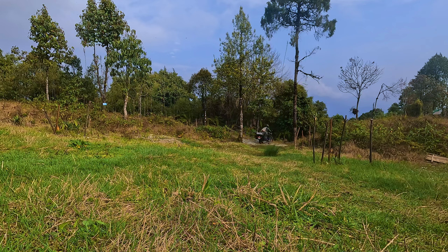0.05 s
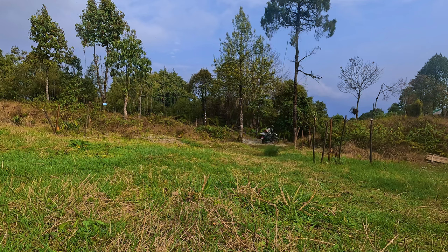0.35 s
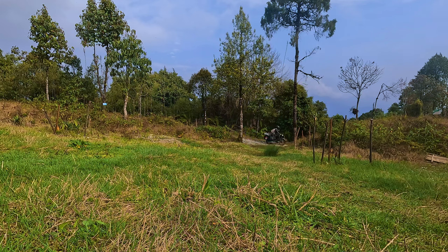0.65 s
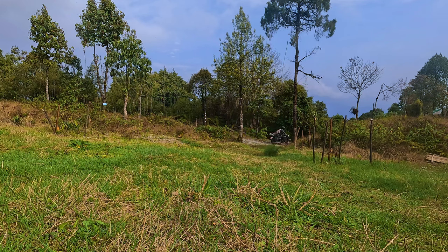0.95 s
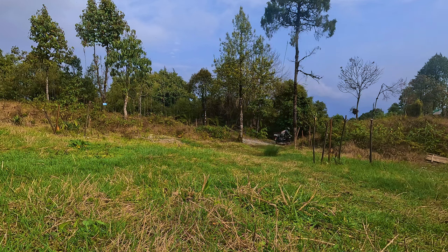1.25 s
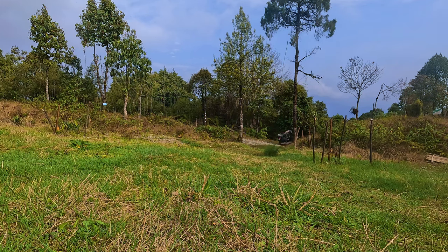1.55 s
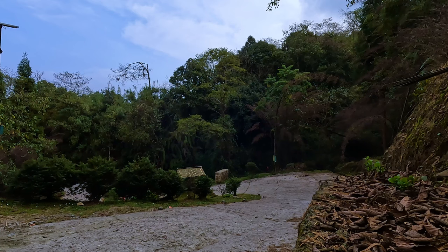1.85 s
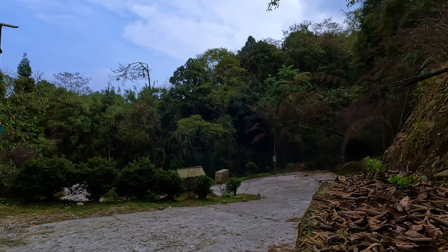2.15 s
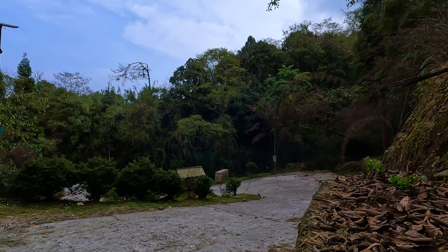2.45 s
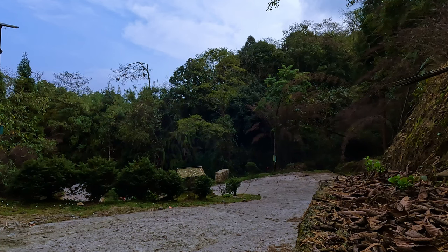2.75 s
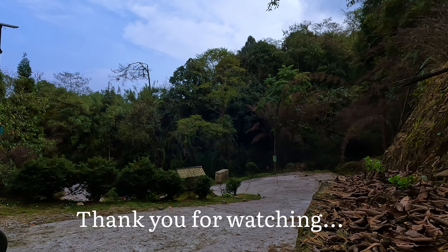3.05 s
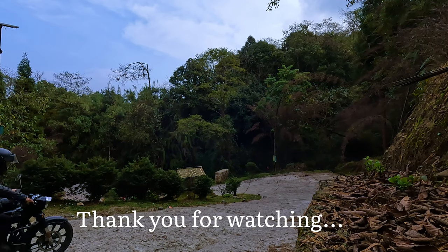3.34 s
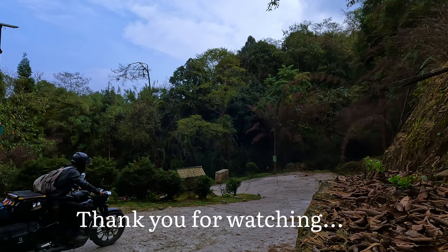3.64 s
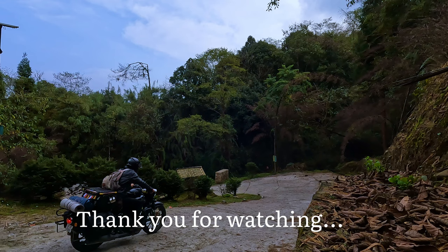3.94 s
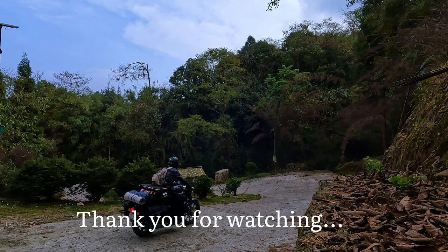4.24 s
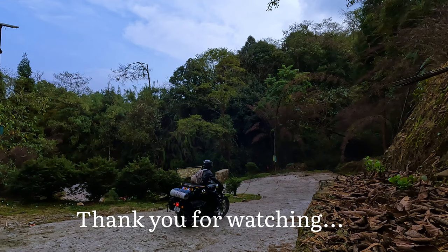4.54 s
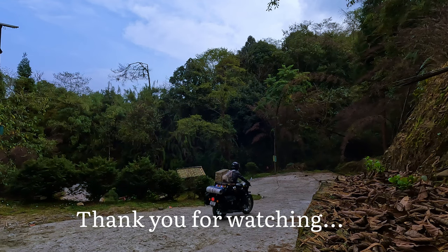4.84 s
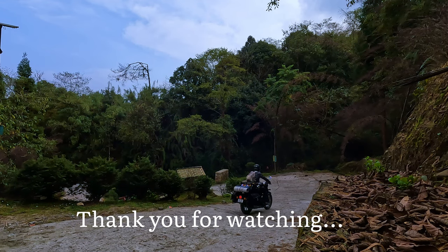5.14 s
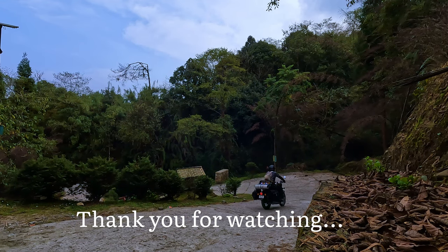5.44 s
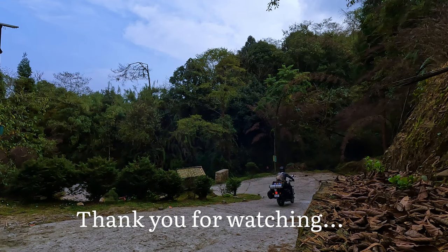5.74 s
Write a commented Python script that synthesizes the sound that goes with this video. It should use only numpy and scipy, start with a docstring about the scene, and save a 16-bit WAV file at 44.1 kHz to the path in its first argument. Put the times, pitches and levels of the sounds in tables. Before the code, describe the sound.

In quiet woodland, thin bird calls sound over the low, steady beat of a faraway motorcycle. The sound suddenly switches to the same bike near the microphone, coming from the left with a short, cracking rev. The single-cylinder engine eases to a slower thump as it goes by, small stones snapping under the tyres while a bird whistles a clear phrase. It recedes with a few clanks and a high trill.

```python
"""A motorcycle on a wooded road

A single-cylinder bike thumps far off across a meadow. Then the scene jumps close: it comes from the
left, barks at a blip of the throttle, passes over gravel and rides away. Each firing of the engine
pushes a puff of gas through the silencer, while the casing rattles and the tyres and chain hiss.
Birds twitter, call, trill and whistle, and the trees echo them."""
import sys
import numpy as np
from scipy import signal
from scipy.fft import rfft, irfft
from scipy.io import wavfile

SR = 44100
rng = np.random.default_rng(int(sys.argv[2]) if len(sys.argv) > 2 else 0)


def put_to_file(sound):
    """Save the sound as 16-bit audio at rate SR, in the file named by the first command-line argument."""
    columns = np.atleast_2d(sound).T  # one column per channel
    safe = np.clip(columns, -1, 1)
    whole_steps = np.round(safe * 32767)
    wavfile.write(sys.argv[1], SR, whole_steps.astype(np.int16))


N = 259749
TIME = np.arange(N) / SR
HZ = np.fft.rfftfreq(N, 1 / SR) + 1e-3


def gain_of(db):
    """Turns decibels into a number to multiply by."""
    return 10 ** (np.asarray(db) / 20)


def evened(x):
    """Scales a signal to an average (rms) level of 1."""
    return x / np.sqrt(np.mean(x ** 2) + 1e-20)


def curve(rows, column=1):
    """Joins a table's points in time with straight lines."""
    rows = np.array(rows)
    return np.interp(TIME, rows[:, 0], rows[:, column])


def colour(x, points, peaks=()):
    """Shapes a tone by (Hz, dB) points and ringing peaks, then evens its level."""
    hz, db = np.transpose(points)
    octaves_outside = np.maximum(np.log2(hz[0] / HZ), 0) + np.maximum(np.log2(HZ / hz[-1]), 0)
    db = np.interp(np.log(HZ), np.log(hz), db) - 24 * octaves_outside
    db += sum(lift / (1 + (2 * (HZ - centre) / width) ** 2) for centre, width, lift in peaks)
    return evened(irfft(rfft(x) * gain_of(db), N))


def muffled(x, hz, steepness):
    """Takes away the treble above hz."""
    return irfft(rfft(x) / (1 + (HZ / hz) ** steepness), N)


def noise(spread):
    """White noise shared by both ears, plus some of their own."""
    return evened(rng.standard_normal(N) + spread * rng.standard_normal((2, N)))


def wander(hz):
    """A random wobble, with little motion faster than hz."""
    return evened(irfft(rfft(rng.standard_normal(N)) * np.exp(-(HZ / hz) ** 2), N))


def bursts(rows, rise_s=0.0022):
    """A level that jumps up and dies away at each (start, dB, fade time)."""
    level = np.zeros(N)
    for start, db, fade_s in rows:
        age = np.maximum(TIME - start, 0)
        level += gain_of(db) * (1 - np.exp(-age / rise_s)) * np.exp(-age / fade_s)
    return level


def tails(hits, fade_s):
    """Gives each hit a fading tail."""
    return signal.lfilter([1], [1, -np.exp(-1 / (fade_s * SR))], hits)


def panned(db):
    """Left and right gains; positive dB leans left."""
    left = gain_of(db) * np.ones(N)
    return 2 * np.array([left, np.ones(N)]) / (1 + left)


def treble_panned(x, db):
    """Low notes bend round the listener, so only higher ones lean to one side."""
    low = muffled(x, 560, steepness=4)
    return low + (x - low) * panned(db)


def woods(x, echo_s):
    """Scattered echoes off trunks and leaves, different at each ear."""
    t = TIME[:SR]
    echoes = rng.standard_normal((2, SR)) * (rng.random((2, SR)) < .05)
    echoes *= gain_of(-60 * t / echo_s) * (t > .006)
    return signal.fftconvolve(x[None], echoes / np.linalg.norm(echoes[0]), axes=1)[:, :N]


def resonance(hz, width):
    """A filter that rings at one pitch."""
    return 1 / (1 + 1j * (HZ - hz ** 2 / HZ) / width)


def puff(hz):
    """The spectrum of a rounded puff of gas, with little above hz."""
    return np.exp(-(HZ / hz) ** 2 / 2)


def count_cycles(ride):
    """Counts engine cycles; the engine fires at each whole number."""
    return .5 + np.cumsum(curve(ride) * (TIME >= ride[0][0])) / SR


def strokes(cycles, lag, uneven_db):
    """One hit of uneven size per cycle, lag cycles after the firing."""
    hits = np.diff(np.floor(cycles - lag), prepend=np.floor(cycles[0] - lag))
    return hits * gain_of(uneven_db * rng.standard_normal(N))


def beat(cycles, lag, fade):
    """A level that jumps once a cycle and fades; lag and fade are in cycles."""
    return np.exp(-((cycles - lag) % 1) / fade)


# The silencer's notes. Each row: pitch in Hz, width in Hz, gain (minus flips the wave).
SILENCER_NOTES = [(48.5, 26, -1.4), (110, 48, 3.35), (121.5, 32, -2.4), (195, 42, -1.0)]
# The tail pipe's overtones. Each row: pitch in Hz, width in Hz, relative level in dB.
PIPE_NOTES = [(229, 34, 5.5), (294, 72, -2), (387, 110, -24), (558, 78, -25.5)]


def thump(cycles, strength_db, odd_db, soft_hz, sharpness, suction):
    """Each firing puffs through the silencer; a third of a cycle later the intake booms in the air box."""
    strength = gain_of(strength_db)
    firings = strength * gain_of(odd_db) * strokes(cycles, 0, .4)
    intakes = strength * suction * strokes(cycles, .325, .8)
    silencer = sum(gain * resonance(hz, width) for hz, width, gain in SILENCER_NOTES)
    pipe = sum(gain_of(db) * resonance(hz, width) for hz, width, db in PIPE_NOTES)
    exhaust = rfft(firings) * puff(soft_hz) * silencer
    air_box = rfft(intakes) * puff(118.6) * resonance(55.8, width=40)
    ring = rfft((firings + 0.35 * intakes) * sharpness) * puff(300) * pipe  # sharp puffs ring the pipe
    ring *= np.exp(-2j * np.pi * HZ * .0015)  # 1.5 ms later
    return gain_of(46) * irfft(exhaust + air_box - ring, N)


def valve_ticks(cycles, lag, second_gain, level_db):
    """The valves make two tiny bright ticks a cycle."""
    hits = strokes(cycles, lag, 1.1) + second_gain * strokes(cycles, 0.23, 2.2)
    tone = [(5000, 3.5), (8000, -1.5), (10300, -4.5), (12500, -1), (14000, -22)]
    return gain_of(level_db) * colour(noise(1) * tails(hits, fade_s=0.0068), tone)


# The far engine. Each row: time in seconds, firings per second, relative strength in dB.
FAR_ENGINE = [(0.0, 8.523, -23.7), (0.2, 8.277, -21.4), (0.4, 8.663, -21.9), (0.55, 8.58, -20.7),
              (0.95, 8.629, -22.4), (1.2, 8.207, -22.5), (1.35, 8.347, -24.0), (1.65, 8.599, -22.0)]
# Echoes off the hillside. Each row: delay in seconds, level in dB against the thump.
HILLSIDE = [(0.054, -22), (.071, -24)]


def far_bike():
    """A distant engine thumps, chuffs and ticks; hill and trees send the thump back."""
    cycles = count_cycles(FAR_ENGINE)
    engine = thump(cycles, curve(FAR_ENGINE, column=2), odd_db=0, soft_hz=147, sharpness=0.053, suction=.25)
    hill = sum(gain_of(db) * np.interp(TIME - delay, TIME, engine, left=0) for delay, db in HILLSIDE)
    trees = gain_of(-10) * woods(engine, echo_s=1).mean(0)
    flow = rng.standard_normal(N) * beat(cycles, .04, 0.18)
    chuff = gain_of(-59) * colour(flow, [(150, 7), (300, -7.5), (550, -16.5), (750, -32.5)])
    ticks = valve_ticks(cycles, lag=.27, second_gain=.2, level_db=-77)
    ticks = muffled(ticks, 10500, steepness=12)  # the air swallows the top
    return engine + hill + trees + chuff + ticks


# The tone of the open air. Each row: pitch in Hz, relative level in dB.
AIR_TONE = [(30, 17.5), (110, 19), (200, 12.5), (330, 5.5), (500, -0.5), (750, -13.5), (1500, -12),
            (2700, -13), (3800, -9.5), (5200, -8.5), (6400, -14), (7600, -15.5), (9500, -19), (12000, -34),
            (15500, -58)]
# Leaf rustles. Each row: start in seconds, strength in dB against the air, fade time in seconds.
LEAF_RUSTLES = [(0.0, 5.5, 0.037), (.795, 0, 0.13), (1.138, 3, 0.067)]


def meadow_air():
    """Air rushes softly over the meadow, swelling when dry leaves rustle."""
    air = colour(noise(0.71) * gain_of(wander(40)), AIR_TONE)
    return gain_of(-55.5) * air * (1 + bursts(LEAF_RUSTLES, rise_s=0.0048))


def bird(notes, overtone_db, waver, echo_db, echo_s, pan_db):
    """Nearly pure notes that bend through three pitches, echoed by the trees."""
    song, tremble = np.zeros(N), 1 + waver * wander(158)
    for start, length, first, middle, last, db in notes:
        at = np.flatnonzero((TIME >= start) & (TIME < start + length))
        arch = np.polyfit([0, .5, 1], [first, middle, last], 2)
        hz = np.polyval(arch, np.linspace(0, 1, len(at)))
        phase = 2 * np.pi * np.cumsum(hz * tremble[at]) / SR
        # low, soft notes are purer
        bright_db = overtone_db + 70 * np.log10(np.minimum(hz / 4000, 1)) + 0.56 * (db + 36)
        overtones = gain_of(bright_db) * np.sin(2 * phase) + gain_of(2.15 * bright_db) * np.sin(3 * phase)
        fade = signal.windows.tukey(len(at), .5)
        song[at] += gain_of(db) * np.sqrt(2) * (np.sin(phase) + overtones) * fade
    return song * panned(pan_db) + gain_of(echo_db) * woods(song, echo_s)


# Twitters. Each row: start and length in seconds, middle pitch and slide in Hz, level in dB.
TWITTER_NOTES = [(0.257, 0.032, 6000, 400, -70), (0.31, 0.039, 6050, 398, -69),
                 (0.405, 0.028, 7360, 400, -71), (0.499, .023, 5700, 40, -67), (.54, 0.11, 3800, -70, -75),
                 (0.554, 0.029, 5940, -900, -68.5), (.835, .02, 5370, -230, -70),
                 (1.04, .13, 7350, -500, -78), (1.27, 0.24, 7600, 60, -83), (1.348, .045, 6750, -1000, -71),
                 (1.508, .054, 7700, -150, -71)]


def twitters():
    """Distant birds sing thin, sliding notes."""
    notes = [(start, length, hz - slide / 2, hz, hz + slide / 2, db)
             for start, length, hz, slide, db in TWITTER_NOTES]
    return bird(notes, overtone_db=-63, waver=0.014, echo_db=-1.5, echo_s=0.4, pan_db=-5)


# Calls from deep in the woods. Each row: start in seconds, top pitch in Hz, level in dB.
CALL_NOTES = [(.465, 2172, -65), (.68, 2177, -63), (1.181, 1330, -81.5), (1.359, 1304, -80.5)]


def hoarse_calls(length_s=0.0984, dip=0.054):
    """Short calls rise and fall; a strong waver makes them hoarse."""
    notes = [(start, length_s, hz * (1 - dip), hz, hz * (1 - dip), db) for start, hz, db in CALL_NOTES]
    return bird(notes, overtone_db=-27, waver=0.06, echo_db=7, echo_s=0.74, pan_db=9)


def distance_db(pass_s=4, nearest_m=3.45, metres_per_s=3.19):
    """How much distance quietens the passing bike: 0 dB at its closest."""
    along = metres_per_s * (TIME - pass_s)
    return 20 * np.log10(nearest_m / np.hypot(along, nearest_m))


# The near engine's speed. Each row: time in seconds, firings per second.
NEAR_ENGINE = [(1.65, 14.186), (1.801, 14.25), (1.868, 13.379), (2.328, 10.572), (2.463, 14.468),
               (2.62, 16.222), (2.795, 13.202), (3.241, 10.738), (3.84, 9.704), (4.21, 7.795),
               (4.749, 8.532), (5.071, 8.562), (5.287, 8.186), (5.9, 8.755)]
# The throttle. Each row: time in seconds, opening from 0 (shut) to 1 (wide open).
THROTTLE_OPENING = [(1.66, 0.67), (1.9, 0.54), (2.3, 0.53), (2.42, 0.98), (2.6, 0.82), (2.72, 0.56),
                    (3.5, 0.37), (4.0, 0.22), (5.85, 0.08)]
# Firings that stumble or kick. Each row: time in seconds, dB against an even firing.
STUMBLES_AND_KICKS = [(1.685, -2), (1.76, -2.5), (1.9, -8), (2.41, -1.5), (2.48, 2), (2.67, -1.5)]


def near_bike():
    """The bike passes close: engine speed sets the beat, throttle the bite, distance the level."""
    cycles, throttle = count_cycles(NEAR_ENGINE), curve(THROTTLE_OPENING)
    odd_db = sum(db * (abs(TIME - when) < .03) for when, db in STUMBLES_AND_KICKS)
    strength_db = -11 + 0.23 * distance_db()
    engine = thump(cycles, strength_db, odd_db, soft_hz=130,
                   sharpness=0.16 * throttle, suction=0.57 + 1.1 * throttle)
    ticks = valve_ticks(cycles, lag=.2, second_gain=.6, level_db=-76) * panned(6)
    return engine + ticks + rumble(cycles, throttle) + rattle(cycles, throttle) + hiss(cycles, throttle)


def rumble(cycles, throttle):
    """Gas flows roughly after each firing, louder with the throttle open."""
    flow = rng.standard_normal(N) * (.5 + beat(cycles, 0.026, 0.23))
    tone = [(30, 3), (90, -1.5), (190, -12), (270, -22), (400, -36.5)]
    return colour(flow, tone) * gain_of(-41.5 + 20 * throttle)


# The rattle's tone from in front and from behind. Each row: pitch in Hz, relative level in dB.
FRONT_TONE = [(200, 12.5), (300, -9.5), (420, -0.5), (570, -12), (740, -18), (1000, -10.5), (1750, -13),
              (2200, -20.5), (3500, -31), (6000, -35.5)]
REAR_TONE = [(200, 7), (300, -7.5), (400, 2), (600, -5), (800, -5.5), (1300, -5.5), (1800, -15.5),
             (2500, -16.5), (4000, -29.5), (6000, -43)]
# The casing's ringing notes. Each row: pitch in Hz, width in Hz, boost in dB.
CASING_NOTES = [(405, 36, 2), (561, 49, 11), (950, 65, 3), (1266, 47, 3.5), (1720, 50, 7), (3000, 17, 2.5),
                (3140, 58, 14.5)]
# Loose parts clank over bumps. Each row: start in seconds, strength in dB against the rattle.
BUMP_CLANKS = [(2.225, -7), (2.305, -5), (5.113, -7), (5.178, 8), (5.444, 7)]
# Where the bike is heard. Each row: time in seconds, lean to the left in dB.
BIKE_SIDE = [(1.66, 15.5), (2.66, 10), (3.6, 3), (5.1, -3.5), (5.89, -3.5)]


def rattle(cycles, throttle):
    """Firings and valves make the casing ring; its tone changes as the bike goes by."""
    pulse = 1 + 0.5 * beat(cycles, 0.0082, 0.32) + 1.25 * beat(cycles, .78, 0.15)
    hits = strokes(cycles, .05, 3.8) + 1.3 * strokes(cycles, .8, 1.7) + 0.8 * strokes(cycles, .3, 4)
    one_knock = rng.standard_normal(SR) * TIME[:SR] * np.exp(-TIME[:SR] / 0.012)
    knocks = signal.fftconvolve(hits, one_knock)[:N]
    shaking = evened(pulse * noise(0.18) * gain_of(0.71 * wander(97))) + 0.59 * evened(knocks)
    front = colour(shaking, FRONT_TONE, CASING_NOTES)
    rear = colour(shaking, REAR_TONE, [(hz, width, boost / 2) for hz, width, boost in CASING_NOTES])
    past = np.clip((TIME - 3) / 1.9, 0, 1)
    casing = (1 - past) * front + past * rear
    casing *= gain_of(-46.5 + 0.67 * distance_db() + 13.5 * throttle)
    casing *= 1 + bursts([(start, db, 0.0077) for start, db in BUMP_CLANKS])
    return treble_panned(casing, curve(BIKE_SIDE))


# The tone of the hiss. Each row: pitch in Hz, relative level in dB.
HISS_TONE = [(1200, -11), (2600, 1.5), (4400, 2), (6200, 0), (7900, -4), (9000, -10.5), (10500, -22),
             (12500, -18.5), (13500, -33), (15000, -30)]


def hiss(cycles, throttle):
    """Tyres and chain fizz, pulsing a little with the engine."""
    pulse = 1 + 0.35 * beat(cycles, 0.16, 0.22)
    fizz = noise(0.44) * pulse * gain_of(1.46 * wander(190) + 1.82 * wander(26))
    level_db = -57 + 0.94 * distance_db() + 12.3 * throttle
    return colour(fizz, HISS_TONE) * gain_of(level_db) * panned(0.43 * curve(BIKE_SIDE) + 1)


# A small bird's trills. Each row: start in seconds, length in seconds, opening level in dB.
TRILL_RUNS = [(2.026, .34, -55), (5.185, .6, -50)]


def trills(top_hz=7520, sink_hz_per_s=880, fade_db_per_s=23, gap_s=0.023):
    """One long note leads a run of short ones that sink and fade; each climbs, then hooks down."""
    notes = []
    for start, length, db in TRILL_RUNS:
        age, note_s = 0, .088
        while age < length and start + age < TIME[-1]:
            top = top_hz - sink_hz_per_s * age
            notes.append((start + age, note_s, top - 225, top, top - 630, db - fade_db_per_s * age))
            age += note_s + gap_s
            note_s = 0.065
    return bird(notes, overtone_db=-63, waver=0.021, echo_db=-3, echo_s=0.3, pan_db=4.5)


# Throttle barks. Each row: start in seconds, relative level in dB, fade time in seconds.
BARK_HITS = [(2.386, -41, 0.017), (2.406, -26, 0.008), (2.462, -32, .008), (2.476, -23, 0.01),
             (2.545, -39.5, 0.012), (2.609, -34.5, 0.0064)]
# A bark's tone. Each row: pitch in Hz, relative level in dB.
BARK_TONE = [(300, 8), (500, 0), (750, -4), (1000, -2.5), (1350, 2.5), (1800, -2), (2300, -4.5),
             (3400, -10), (5000, -11), (7700, -15), (9500, -32), (12500, -22.5), (15000, -41)]
# The casing rings under a bark. Each row: pitch in Hz, width in Hz, boost in dB.
BARK_NOTES = [(1340, 110, 9), (1740, 120, 10.5)]


def barks():
    """A blip of the throttle makes a few firings crack."""
    crack = colour(noise(0.25), BARK_TONE, BARK_NOTES) * bursts(BARK_HITS)
    return treble_panned(gain_of(2) * crack, db=12.6)


# Gulps of air at the open throttle. Each row: time in seconds, relative level in dB.
AIR_GULPS = [(2.4049, -7), (2.476, -8), (2.5448, -12), (2.6114, -2.5)]


def gulps():
    """Sudden gulps of air boom in the air box."""
    hits = np.zeros(N)
    for when, db in AIR_GULPS:
        hits[round(when * SR)] = gain_of(db + 45.5)
    return irfft(rfft(hits) * puff(150) * resonance(62, width=54), N)


# Snaps of grit. Each row: start in seconds, relative level in dB.
GRIT_SNAPS = [(3.608, -45.5), (3.858, -44.5), (4.101, -42.5), (4.401, -47), (4.428, -55), (4.457, -46.5),
              (4.611, -46), (4.785, -49.5), (5.131, -50.5), (5.449, -49.5)]


def grit():
    """Small stones snap under the tyres."""
    snap = colour(noise(0.21), [(1200, 6.5), (3500, 2.5), (7500, -1), (10000, -9.5), (14500, -32)])
    return gain_of(14.5) * snap * bursts([(start, db, .002) for start, db in GRIT_SNAPS])


# The tone of the crunch. Each row: pitch in Hz, relative level in dB.
GRAVEL_TONE = [(2500, 1), (5000, -3), (9500, 5), (12500, -4), (14500, -13)]


def gravel(middle_s=4.4, spread_s=0.41, peak_stones_per_s=58):
    """Fine stones crunch under the tyres at random, most often in the middle of the patch."""
    rate = peak_stones_per_s * np.exp(-((TIME - middle_s) / spread_s) ** 2 / 2)
    stones = (rng.random(N) < rate / SR) * gain_of(1.2 * rng.standard_normal(N))
    power = tails(stones ** 2, fade_s=0.0069)
    return gain_of(-61.5) * np.sqrt(power) * colour(noise(.9), GRAVEL_TONE)


# Whistles. Each row: start and length in seconds, first, middle and last pitch in Hz, level in dB.
WHISTLE_NOTES = [(4.015, 0.047, 3890, 3840, 3740, -47), (4.070, 0.088, 3270, 3130, 3490, -41.5),
                 (4.155, 0.049, 3760, 3730, 3750, -40.5), (4.240, 0.04, 3610, 3880, 3850, -49.5),
                 (4.277, 0.054, 3800, 3758, 3750, -34.5), (4.322, 0.04, 3770, 3904, 4000, -33.5),
                 (4.580, 0.075, 3770, 3690, 3750, -49), (4.635, 0.084, 3670, 3965, 4280, -36.5)]


def whistles():
    """A nearby bird whistles a quick, clear phrase."""
    return bird(WHISTLE_NOTES, overtone_db=-15, waver=0.0064, echo_db=-8, echo_s=0.27, pan_db=1.5)


def scene(jump_s=1.66, blend_s=0.029):
    """The far scene gives way to the near one, with birds over both."""
    far = far_bike() + meadow_air()
    near = near_bike() + gulps() + barks() + grit() + gravel()
    birds = whistles() + trills() + twitters() + hoarse_calls()
    blend = np.clip((TIME - jump_s) / blend_s + .5, 0, 1)
    return (1 - blend) * far + blend * near + birds


def record(dry, top_hz=15600):
    """Takes away the very highest treble."""
    lowpass = signal.firwin(511, top_hz, window=("kaiser", 9), fs=SR)
    return signal.oaconvolve(dry, lowpass[None], "same")


dry = scene()
out = record(dry)
put_to_file(out)
```